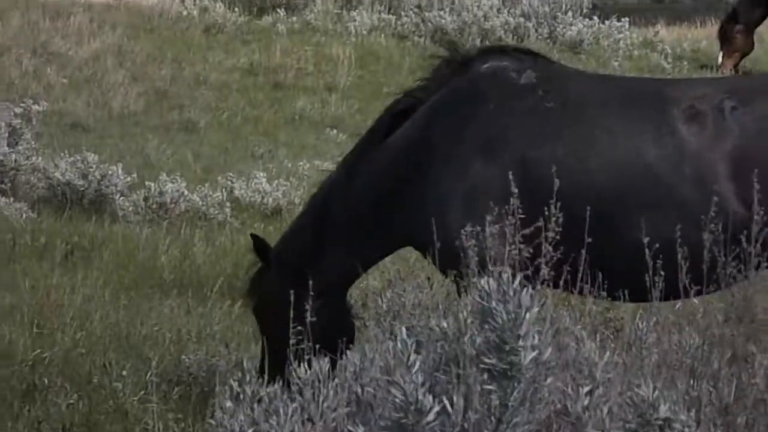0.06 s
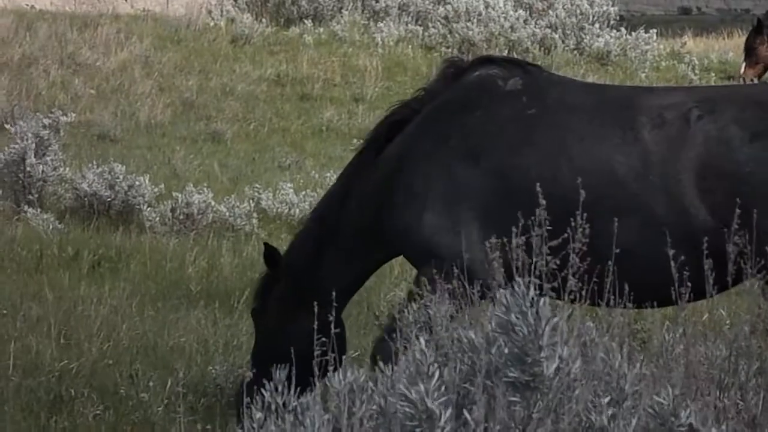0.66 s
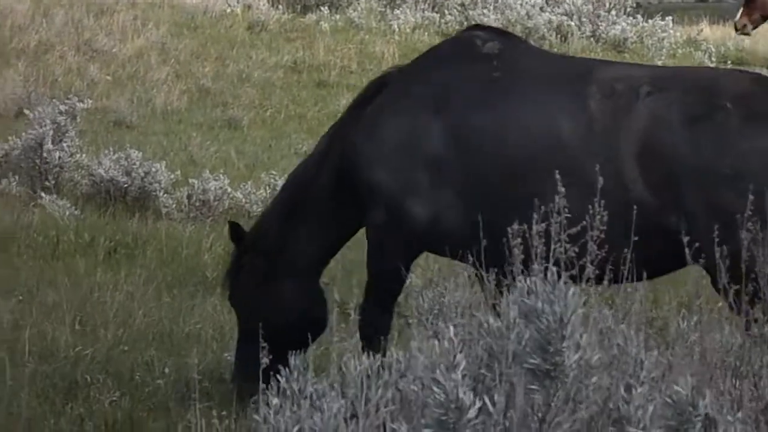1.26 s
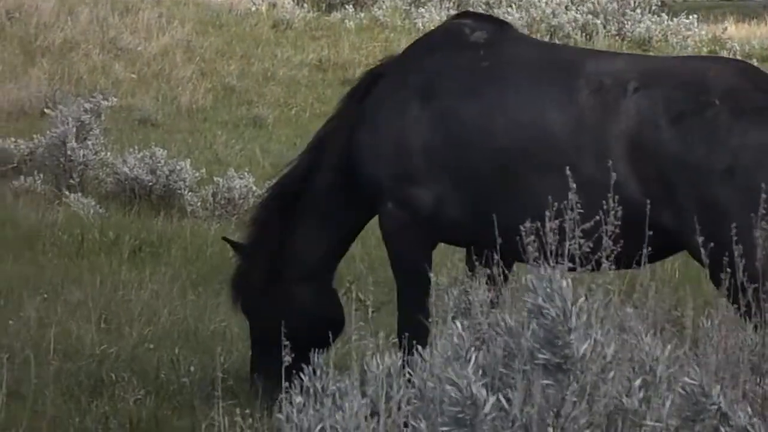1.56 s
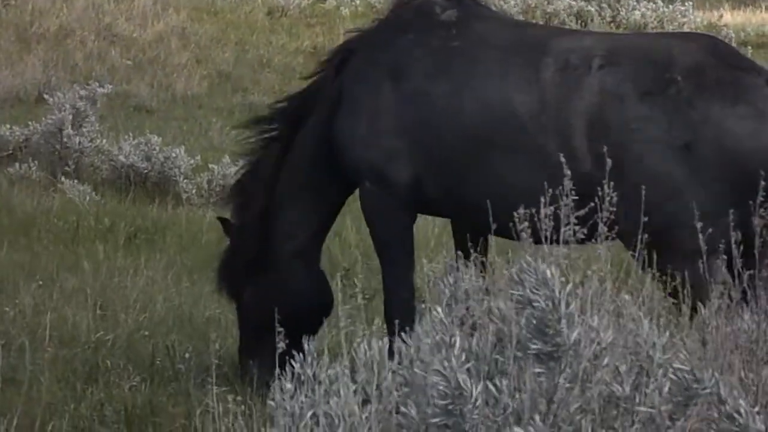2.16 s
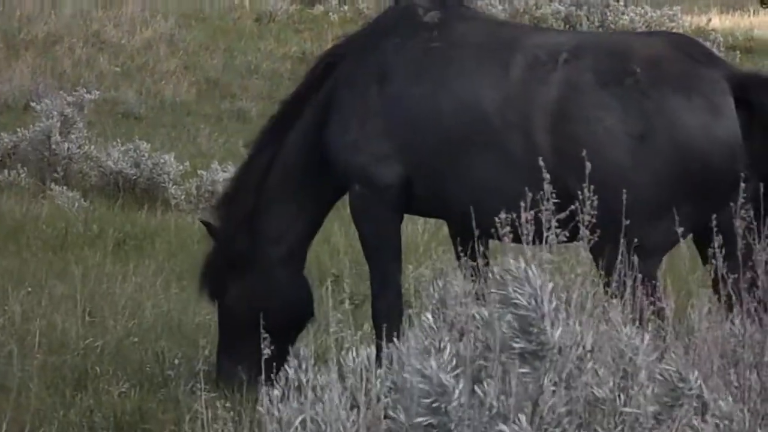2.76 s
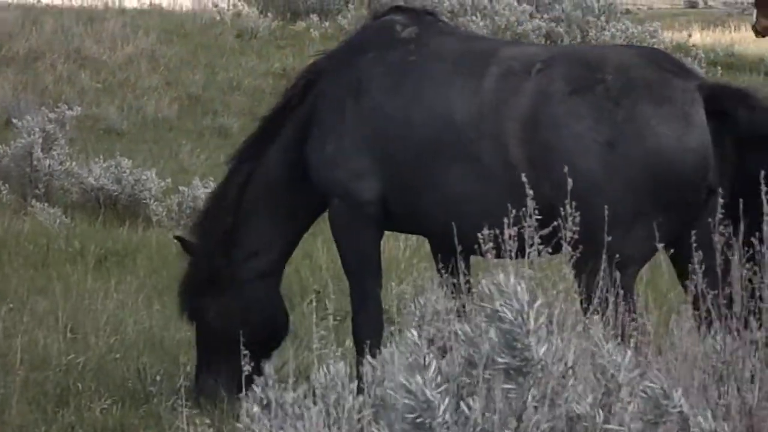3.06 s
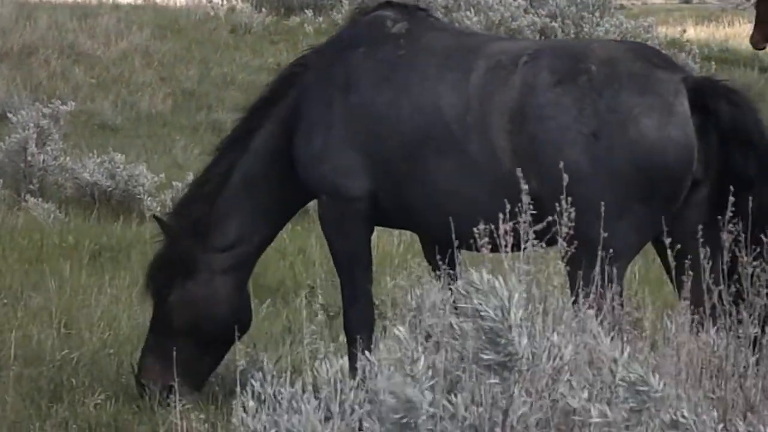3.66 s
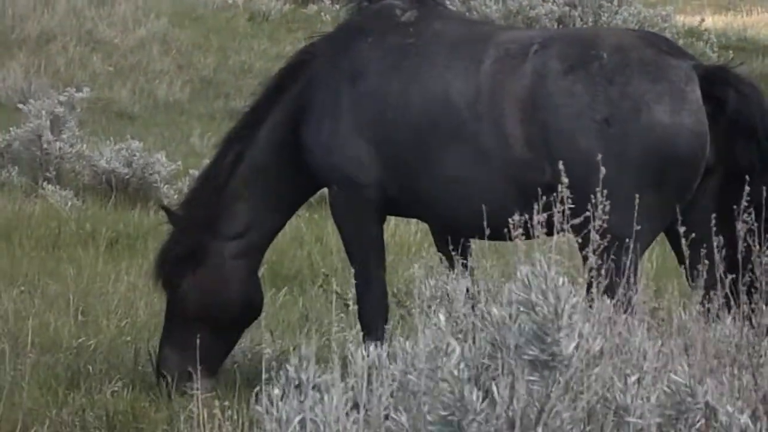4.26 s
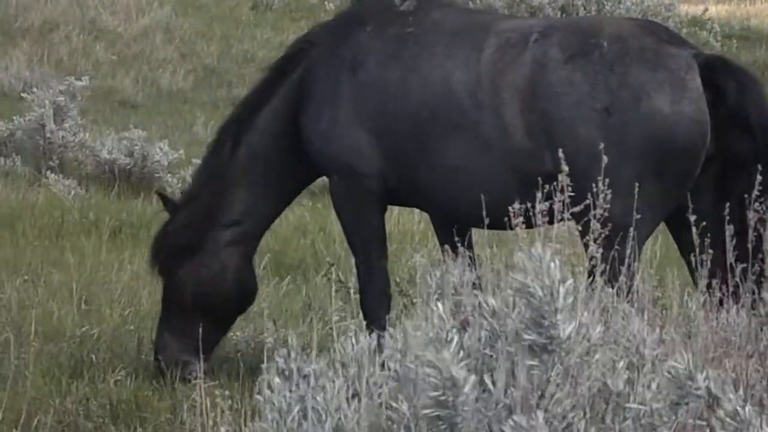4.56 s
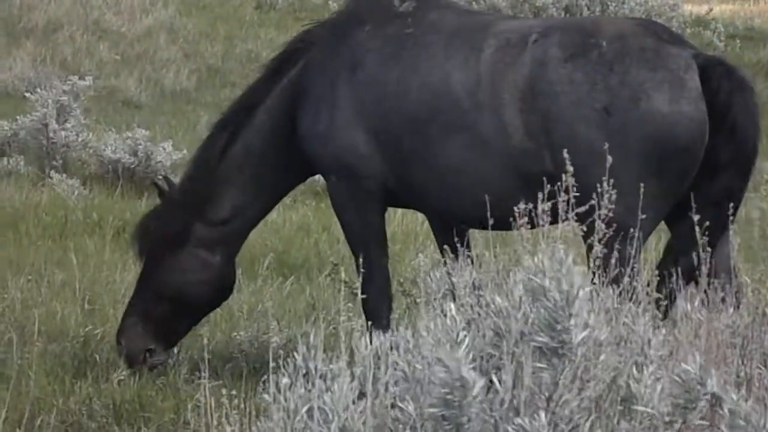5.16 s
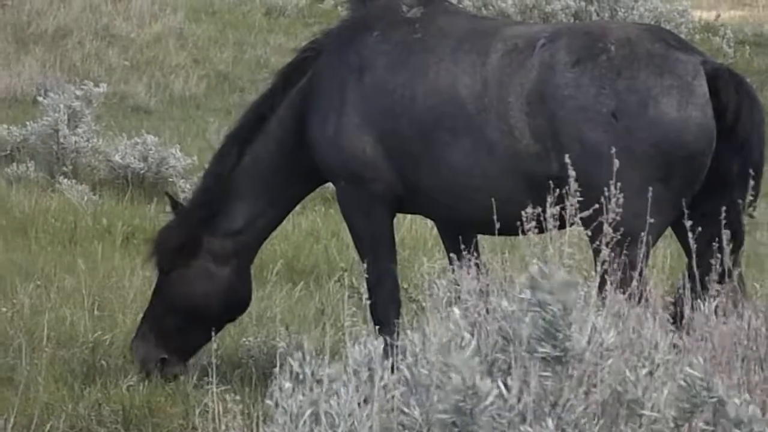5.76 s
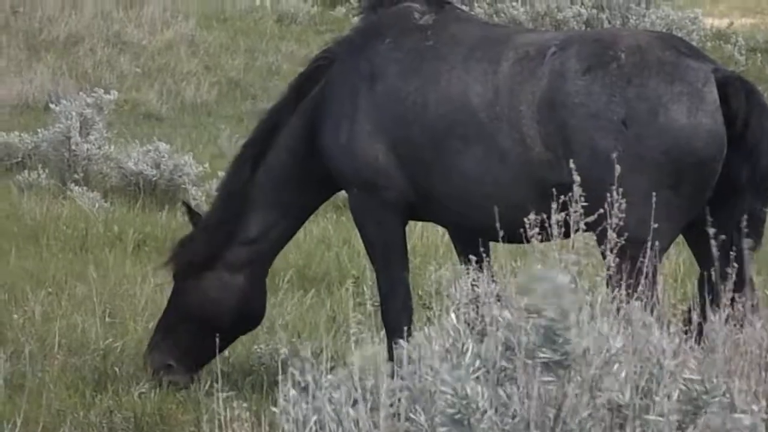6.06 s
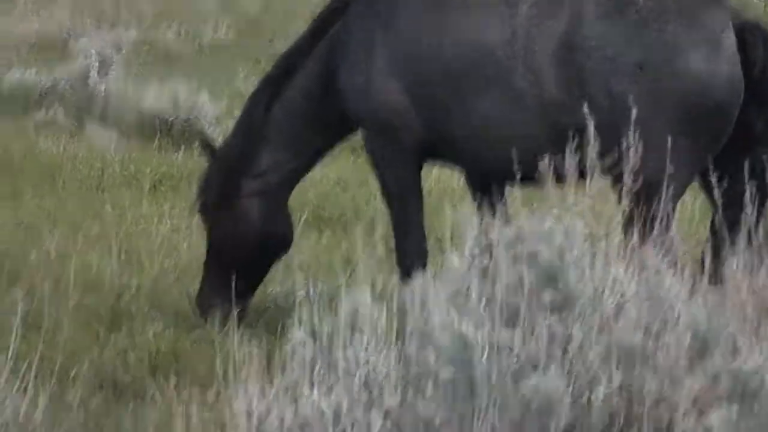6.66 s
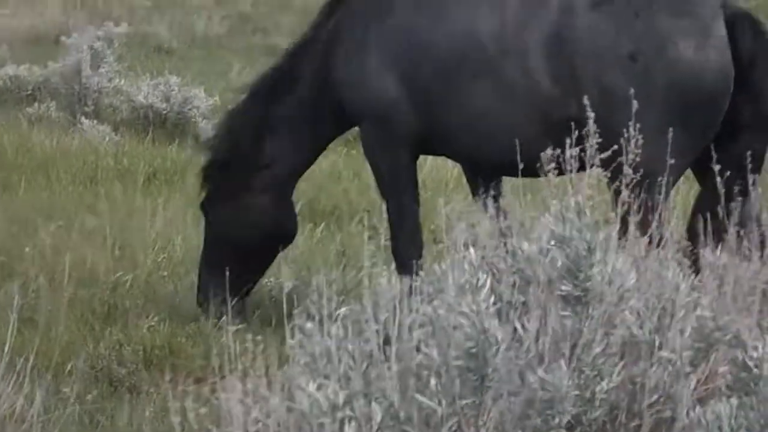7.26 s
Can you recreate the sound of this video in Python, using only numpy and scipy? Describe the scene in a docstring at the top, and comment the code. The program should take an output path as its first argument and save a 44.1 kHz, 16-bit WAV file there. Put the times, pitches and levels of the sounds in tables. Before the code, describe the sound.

A quiet open pasture is heard through a hand-held microphone, with a soft, steady murmur of air and faint, high insect chirps repeating three or four times a second almost throughout. In the first 0.7 seconds come close, dry handling scuffs, a small snap and a hollow knock at about 0.4 seconds. From 0.8 to 1.5 seconds a gust buffets the microphone with low, fluttering thumps, loudest just after 1 second. The wind then drops to light puffs. Grass swishes very faintly from about 2.8 to 5 seconds, and a softer run of wind bumps comes from 3.8 to 4.5 seconds. A dry knock on the microphone housing sounds at 4.6 seconds, followed by a lighter one at 4.9. Small wind thumps pass at about 5.4 and 6.1 seconds, then air, insects and a trace of grass hiss continue until about 7.5 seconds.

```python
"""Breeze over a pasture

Light gusts buffet a hand-held microphone, their eddies passing as soft thumps of pressure.
Close by, dry scuffs and knocks, likely of the hand, ring the modes of its hollow housing.
Behind them the air murmurs, grass blades swish together and insects chirp in short falling pulses."""
import sys
import numpy as np
from scipy import signal
from scipy.fft import rfft, irfft
from scipy.io import wavfile
from scipy.ndimage import uniform_filter1d

SR = 44100
rng = np.random.default_rng(int(sys.argv[2]) if len(sys.argv) > 2 else 0)


def bounce(signal):
    """Save signal as a 16-bit WAV file at the path given by the first command-line argument."""
    frames = np.transpose(np.atleast_2d(signal))
    limited = np.clip(frames, -1, 1)
    pcm = np.round(limited * 32767).astype(np.int16)
    wavfile.write(sys.argv[1], SR, pcm)


N = 330750
T = np.arange(N) / SR


def from_db(db):
    """Amplitude ratio of a level in decibels."""
    return 10 ** (np.asarray(db) / 20)


def rms_one(x):
    """Normalisation to an rms of 1."""
    return x / np.sqrt(np.mean(x ** 2) + 1e-20)


def evened(x, span_s):
    """Division by the running rms flattens a signal's envelope."""
    return x / np.sqrt(uniform_filter1d(x ** 2, max(int(span_s * SR), 3)) + 1e-12)


def drift(corner_hz):
    """Low-passed noise gives a slow random modulation of unit spread."""
    step, settle = 40, 2000
    r = np.exp(-2 * np.pi * corner_hz * step / SR)
    slow = signal.lfilter([1], [1, -2 * r, r * r], rng.standard_normal(N // step + settle + 2))[settle:]
    return np.interp(np.arange(N) / step, np.arange(len(slow)), rms_one(slow))


def noise(spectrum):
    """Spectral shaping colours white noise; the result has an rms of 1."""
    points, hz = np.array(spectrum), np.arange(N // 2 + 1) * SR / N
    level_db = np.interp(np.log(hz + 1), np.log(points[:, 0]), points[:, 1])
    return rms_one(irfft(rfft(rng.standard_normal(N)) * from_db(level_db) * (hz > 12), N))


def band(x, low_hz, high_hz):
    """A causal band-pass filter."""
    edges_hz = [low_hz, min(high_hz, .45 * SR)]
    return signal.sosfilt(signal.butter(3, edges_hz, "band", fs=SR, output="sos"), x)


def resonance(x, hz, width_hz):
    """A damped two-pole resonator with unit peak gain."""
    r = np.exp(-np.pi * width_hz / SR)
    feedback = [1, -2 * r * np.cos(2 * np.pi * hz / SR), r * r]
    return signal.lfilter(np.array([1, 0, -1]) * (1 - r * r) / 2, feedback, x)


def strokes(times, levels_db, rises, t60s, hold=0.98):
    """Envelopes of incoherent strokes add in power; a hold above 1 makes each decay late and abrupt."""
    power = np.zeros(N)
    for s, level_db, rise, t60 in zip(times, levels_db, rises, t60s):
        near = slice(max(int((s - 3 * rise) * SR), 0), int((s + t60) * SR))
        age = T[near] - s
        shape = np.exp(np.where(age < 0, -(age / rise) ** 2, -np.log(1000) * np.abs(age / t60) ** hold))
        power[near] += (from_db(level_db) * shape) ** 2
    return np.sqrt(power)


def air(murmur_db=-50, drone_hz=585, drone_width_hz=18, drone_db=-65):
    """Broadband noise is the murmur of open country; a narrow band is heard as a faint, far drone."""
    # Each row: frequency in Hz, relative spectral density in dB.
    murmur_spectrum = [(20, 3.5), (40, -8), (80, -1.5), (200, 1), (350, -1.5), (600, -5.5), (850, -6.5),
                       (1150, -12.5), (2200, -18.5), (3500, -25), (4500, -26.5), (7000, -29.5),
                       (12000, -31), (16000, -34)]
    drone = rms_one(resonance(rng.standard_normal(N), drone_hz, drone_width_hz))
    return from_db(murmur_db) * noise(murmur_spectrum) + from_db(drone_db) * drone


def airflow(lull_db=-54, gust_gain_db=1.0):
    """A steady breeze, light puffs and one gust add in power to give the strength of the wind."""
    # Each row: time in seconds, level of the gust in dB before its gain.
    gust_contour = [(0.87, -51), (0.904, -36), (0.964, -30.5), (0.996, -19.5), (1.072, -26), (1.24, -29),
                    (1.268, -37), (1.448, -31), (1.62, -66)]
    # Each row: centre in seconds, level in dB, half length in seconds.
    puffs = [(0.03, -42, 0.11), (0.203, -46, 0.1), (0.61, -45, 0.093), (0.758, -32.5, 0.035),
             (0.847, -32, 0.016), (2.599, -42.5, 0.048), (2.801, -43.5, 0.026), (3.165, -47, 0.078),
             (3.424, -39, 0.029), (3.869, -31.5, 0.04), (3.956, -39.5, 0.053), (4.102, -37, 0.034),
             (4.192, -35.5, 0.019), (4.332, -40, 0.063), (4.496, -39, 0.014), (5.4, -39.5, 0.073),
             (5.707, -51.5, 0.15), (6.094, -45, 0.049), (7.076, -44.5, 0.038)]
    gust = from_db(gust_gain_db + np.interp(T, *np.transpose(gust_contour), left=-np.inf, right=-np.inf))
    power = from_db(lull_db) ** 2 + gust ** 2
    for s, level_db, half_s in puffs:
        bell = np.exp(-np.minimum(((T - s) / half_s) ** 2, 50))
        power += (from_db(level_db) * bell) ** 2
    return uniform_filter1d(np.sqrt(power), SR // 100)


def wind(lumpy_db=3.0, ceiling_db=-30, flutter_db=-33.5, flutter_growth=1.72, shedding=2.5, port_hz=56):
    """Turbulence at the microphone makes a lumpy rumble, single thumps and a fast flutter."""
    # Large eddies, then small ones. Each row: frequency in Hz, relative spectral density in dB.
    buffet_spectrum = [(20, -41), (45, -8), (80, 4), (120, 1.5), (190, -1.5), (280, -16), (420, -20.5),
                       (700, -51), (1400, -75)]
    flutter_spectrum = [(150, -6), (300, 27.5), (420, 15.5), (600, 6.5), (850, 1), (1200, -58), (2000, -56)]
    flow = airflow()
    limited_flow = flow / np.hypot(1, flow / from_db(ceiling_db))
    rumble = limited_flow * from_db(lumpy_db * drift(16.7)) * evened(noise(buffet_spectrum), 0.0294)
    pressure, rims = eddy_pulses(thumps() + small_eddies(flow))
    # Faster air sheds smaller eddies, most of all at the rims of quick, strong ones.
    stir = (flow * np.hypot(flow, shedding * rims)) ** (flutter_growth / 2)
    stir /= np.sqrt(uniform_filter1d(stir ** 2, SR // 10).max())
    flutter = from_db(flutter_db) * stir * evened(noise(flutter_spectrum), 0.0057)
    return rumble + band(pressure, port_hz, 3300) + flutter


def eddy_pulses(passing, gain_db=-3.5, width_cycles=0.65, cusp_s=0.00063, cusp_db=-23):
    """Each passing eddy is one pointed swing of pressure; returns the pressure and the rims' strength."""
    pressure, rims = np.zeros(N), np.zeros(N)
    for (s, level_db, hz), phase in zip(passing, rng.uniform(0, 2 * np.pi, len(passing))):
        near = slice(int(s * SR) - SR // 20, int(s * SR) + SR // 20)
        age = T[near] - s
        cycles, quickness = age * hz, (hz / 200) ** 2
        swell = from_db(level_db + gain_db) / np.cosh(2 * cycles / width_cycles)
        cusp = from_db(cusp_db) * quickness * np.exp(-np.abs(age) / cusp_s) * np.sign(np.cos(phase))
        pressure[near] += swell * (np.cos(2 * np.pi * cycles + phase) + cusp)
        rims[near] += swell * quickness
    return pressure, rims


def small_eddies(flow, size_db=3.5, centre_hz=175, spread_octaves=0.11, count=220):
    """Convection carries eddies past at uneven intervals, their strength in proportion to the flow."""
    times = np.linspace(.1, T[-1] - .1, count) + rng.uniform(-.5, .5, count) * T[-1] / count
    levels_db = 20 * np.log10(np.interp(times, T, flow)) + size_db
    octaves = spread_octaves * rng.standard_normal((count, 2))[:, 1]
    return list(zip(times, levels_db, centre_hz * 2 ** octaves))


def thumps(lag_s=0.0119, flank_db=-9.5, jitter_s=0.0021):
    """A strong eddy, flanked by two weaker ones, is heard as a single thump of pressure."""
    # Each row: time in seconds, relative peak level in dB, frequency in Hz.
    strong_eddies = [(0.839, -23.5, 196), (1.002, -14.5, 175), (1.042, -6.5, 210), (1.074, -7, 195),
                     (1.117, -12, 147), (1.157, -15, 170), (1.285, -14, 187), (1.325, -13, 188),
                     (1.373, -14, 215), (1.44, -20.5, 160), (3.859, -22.5, 192), (5.415, -22, 140),
                     (6.078, -28, 159)]
    flanks = [(s + side * lag_s + jitter_s * rng.standard_normal(), level_db + flank_db, hz)
              for s, level_db, hz in strong_eddies for side in (-1, 1)]
    return list(strong_eddies) + flanks


def contacts(drag_lead_s=0.011, crack_lead_s=0.0034, snap_s=.269, snap_db=-33, rattle_lag_s=0.0153):
    """Friction and impact excite the housing: three knocks, light scuffs and a snap with its rattle."""
    # Each row: time of the blow in seconds, level in dB, extra thud in dB, clack frequency in Hz,
    # drag length in seconds, touch level in dB, crack level in dB.
    blows = [(0.379, -25.5, 5.5, 1150, 0.0385, -33.5, -46), (4.6304, -27.5, 5, 1230, 0.039, -39.5, -29.5),
             (4.874, -33, -6.5, 1590, .072, -48, -40)]
    # A blow lands, then settles. Each row: delay in seconds, thud, clack and tick offsets in dB,
    # rise and 60 dB decay times in seconds, clack frequency ratio.
    landing = [(0, 2, 1, -19, .0028, .075, 1), (0.019, -14, -42, -43, .0025, 0.18, 0.72)]
    # Each row: time in seconds, clack, thud and tick levels in dB, rise in seconds, clack in Hz.
    scuffs = [(0.039, -43.5, -37.5, -52, 0.008, 1190), (0.103, -42.5, -37.5, -53, 0.0051, 1240),
              (0.231, -42.5, -33.5, -50.5, 0.0012, 1110), (0.559, -51, -45.5, -76, .011, 1200),
              (0.605, -38.5, -37.5, -56.5, 0.02, 1120), (0.643, -46, -44.5, -63, 0.0069, 2720),
              (3.776, -52, -49, -64, .004, 2760)]
    # Each row: time in seconds, thud, clack and tick in dB, rise and decay in seconds, clack in Hz.
    rows = []
    for s, db, heavy_db, hz, drag_s, touch_db, crack_db in blows:
        # A touch, a drag and a crack as the contact breaks loose lead up to the blow.
        rows.append((s - drag_s, touch_db, touch_db, touch_db - 20, 0.15 * drag_s, 0.11, hz))
        rows.append((s - drag_lead_s, db - 13, db - 17.5, db - 29.5, 0.52 * drag_s, 0.11, hz))
        rows.append((s - crack_lead_s, crack_db - 13, crack_db, crack_db - 11, 0.0034, 0.022, 2600))
        for delay, thud_db, clack_db, tick_db, rise, t60, ratio in landing:
            levels_db = db + heavy_db + thud_db, db + clack_db, db + tick_db
            rows.append((s + delay, *levels_db, rise, t60, hz * ratio))
    for s, clack_db, thud_db, tick_db, rise, hz in scuffs:
        rows.append((s, thud_db, clack_db, tick_db, rise, 0.12, hz))
    for s, db in (snap_s, snap_db), (snap_s + rattle_lag_s, snap_db - 6):
        rows.append((s, db - 8, db - 8, db, 0.001, 0.1, 3050))
    return rows


def housing(slips_per_s=9000, direct_db=-29, mode_spread_db=1.0):
    """A crush of tiny frictional slips drives the resonant modes of a small hollow body."""
    # Each row: mode frequency in Hz, bandwidth in Hz, relative level in dB.
    modes = [(289, 88, 3), (411, 61, 5.5), (518, 110, -0.5), (643, 165, -0.5), (815, 160, -2),
             (1144, 66, -0.5), (1270, 47, -2), (1390, 150, -7), (1820, 210, -10.5), (2300, 270, -10.5),
             (3010, 410, -14.5), (3720, 370, -12.5), (3960, 1200, -19.5), (5110, 100, -12.5),
             (5380, 370, -23.5), (7040, 920, -19), (8300, 1000, -24.5), (11100, 2600, -21),
             (13600, 4000, -42.5)]
    slipping = rng.random(N) < slips_per_s / SR
    slips = slipping * rng.standard_normal(N) * from_db(-rng.standard_normal(N))
    body = from_db(direct_db) * slips
    for k, (hz, width_hz, level_db) in enumerate(modes):
        mode_rms = slips.std() * np.sqrt(np.pi * width_hz / SR)
        ringing = mode_rms * evened(resonance(slips, hz, width_hz), 0.073)
        body += (-1) ** k * from_db(level_db + mode_spread_db * drift(20)) * ringing
    return body


def knocks(thud_lag_s=0.0035, clack_width_hz=1500):
    """Each contact starts a damped vibration: a high tick and a clack, then a low thud just after."""
    s, thud_db, clack_db, tick_db, rise, t60, clack_hz = np.transpose(contacts())
    body = housing()
    thud = evened(band(body, 205, 750), 0.0043) * strokes(s + thud_lag_s, thud_db, rise, t60, hold=0.93)
    tick = evened(band(body, 4560, 14500), 0.0018) * strokes(s, tick_db, rise, 0.96 * t60)
    middle, clack = band(body, 550, 6300), np.zeros(N)
    for k, hz in enumerate(clack_hz):  # a harder contact favours higher modes
        near = slice(max(int(s[k] * SR) - SR // 10, 0), int(s[k] * SR) + SR // 2)
        envelope = strokes([s[k]], [clack_db[k]], [rise[k]], [t60[k]])[near]
        clack[near] += envelope * evened(resonance(middle[near], hz, clack_width_hz), 0.022)
    return thud + clack + tick


def near_chirps(wander_hz=40, uneven_db=0.2):
    """Two insects, one high and one low, chirp periodically in bouts, no two chirps quite alike."""
    # Each row: first chirp, last chirp and nominal period in seconds, pitch in Hz, relative level in dB.
    bouts = [(0.575, 2.457, .31, 5820, -60.5), (2.925, 3.22, .31, 5820, -64.5),
             (3.748, 4.026, .31, 5850, -60.5), (0.115, 0.385, .26, 5480, -63),
             (0.7, 1.642, .3, 5250, -63.5), (2.06, 3.43, .26, 5260, -63.5), (4.212, 4.452, .26, 5400, -63),
             (5.195, 5.937, .26, 5440, -61.5), (6.3, 7.25, .26, 5380, -62.5)]
    return [(s, hz + wander_hz * rng.standard_normal(), level_db - uneven_db * rng.standard_normal())
            for first, last, period, hz, level_db in bouts
            for s in np.linspace(first, last, round((last - first) / period) + 1)]


def stridulation(chirps, period_s=.034, half_stroke_s=.006, fall_hz_per_s=33000,
                 first_db=-6, first_flat_hz=170, uneven_db=2.0, jitter_s=0.0014, stray_hz=35):
    """Stridulation: four wing strokes a chirp, each a falling tone pulse, the first weak and flat."""
    out = np.zeros(N)
    for (s, hz, chirp_db), chance in zip(chirps, rng.standard_normal((len(chirps), 4, 3))):
        for k, (louder, later, sharper) in enumerate(chance):
            centre = s + k * period_s + jitter_s * later
            near = slice(max(int(centre * SR) - SR // 20, 0), int(centre * SR) + SR // 20)
            age, starting = T[near] - centre, np.exp(-k * k)
            pitch_hz = hz + stray_hz * sharper - first_flat_hz * starting
            cycles = pitch_hz * age - fall_hz_per_s * age ** 2 / 2
            gain = from_db(chirp_db + first_db * starting + uneven_db * louder)
            out[near] += gain * np.exp(-(age / half_stroke_s) ** 2) * np.sin(2 * np.pi * cycles)
    return out


def insects(near_gain_db=-1, far_db=-71, far_hz=5250, spread_hz=160, count=30, haze_gain=.6, haze_s=.022):
    """Scattering by the grass adds a short haze to the near insects and a far chorus."""
    far_s = (np.arange(count) + rng.random(count)) * T[-1] / count
    far_chirps = np.transpose([far_s, rng.normal(far_hz, spread_hz, count), np.full(count, far_db)])
    song = from_db(near_gain_db) * stridulation(near_chirps()) + stridulation(far_chirps)
    scatter = rng.standard_normal(SR // 10) * np.exp(-T[:SR // 10] / haze_s)
    return song + haze_gain * signal.fftconvolve(song, scatter / np.linalg.norm(scatter))[:N]


def grass(rustle_db=.8, crackle_db=2.0, decay_per_rise=3.4):
    """Friction between brushing blades gives swishes of faint, high, grainy hiss."""
    # Each row: frequency in Hz, relative spectral density in dB.
    hiss_spectrum = [(2000, 2), (4000, 15), (7000, -1), (10000, 2), (13000, -2), (16000, 0)]
    # Each row: time of the peak in seconds, level in dB, rise in seconds, lower band edge in Hz.
    swishes = [(2.829, -57, .006, 6500), (3.175, -63.5, .048, 10500), (3.53, -61.5, 0.14, 6500),
               (3.675, -65, .012, 4000), (4.105, -64, .04, 8000), (4.52, -64, 0.22, 10500),
               (6.6, -67, .27, 9020)]
    hiss = noise(hiss_spectrum) * from_db(rustle_db * drift(30) + crackle_db * drift(250))
    out = np.zeros(N)
    for s, level_db, rise, edge_hz in swishes:
        t60 = decay_per_rise * rise
        near = slice(max(int((s - 3 * rise) * SR), 0), int((s + t60) * SR))
        envelope = strokes([s], [level_db], [rise], [t60], hold=2)[near]
        out[near] += envelope * rms_one(band(hiss[near], edge_hz, SR / 2))
    return out


def scene():
    """Superposition: the pressures of all sources add at one microphone."""
    return (air() + wind() + knocks() + grass() + insects())[None]


def record(dry, cutoff_hz=15800):
    """A steep low-pass filter removes the highest treble."""
    return signal.sosfilt(signal.ellip(10, .2, 70, cutoff_hz, fs=SR, output="sos"), dry)


dry = scene()
out = record(dry)
bounce(out)
```